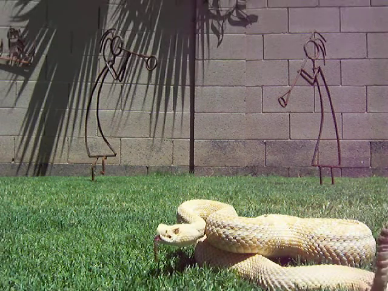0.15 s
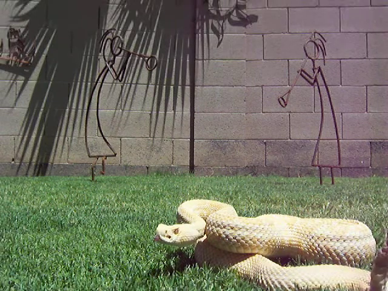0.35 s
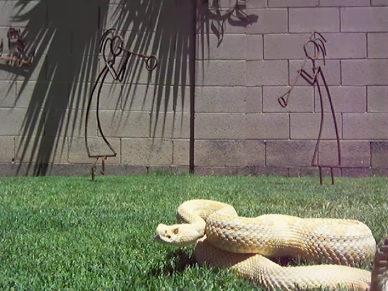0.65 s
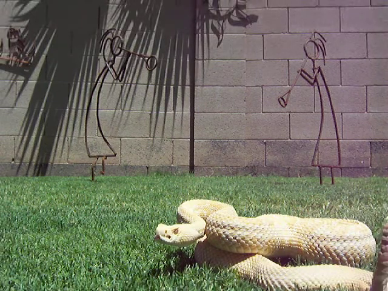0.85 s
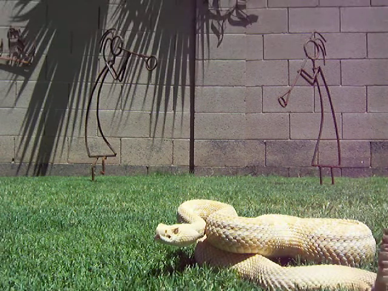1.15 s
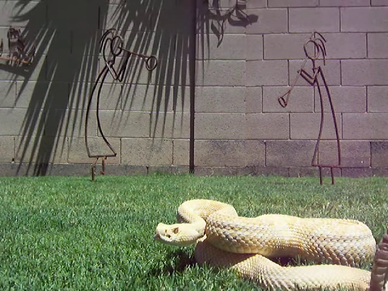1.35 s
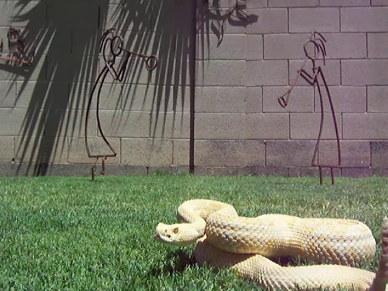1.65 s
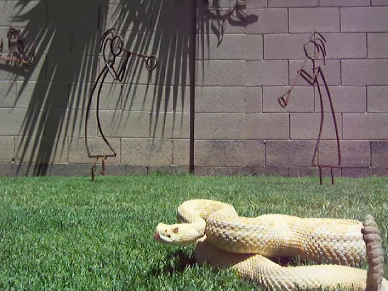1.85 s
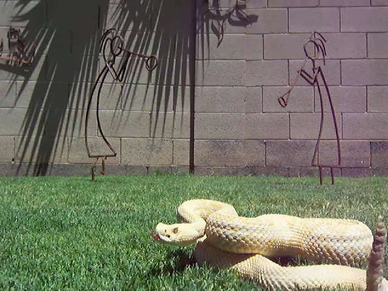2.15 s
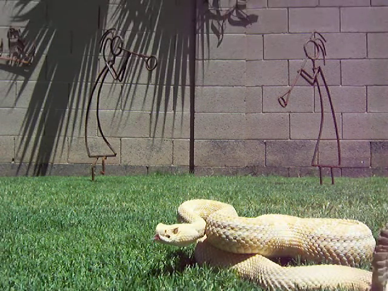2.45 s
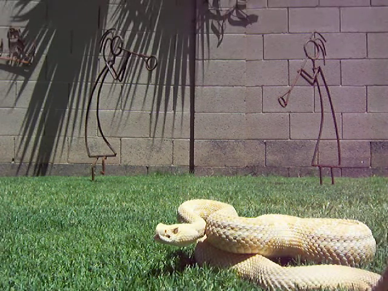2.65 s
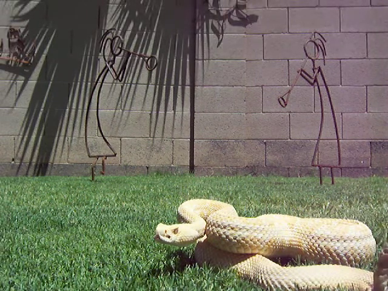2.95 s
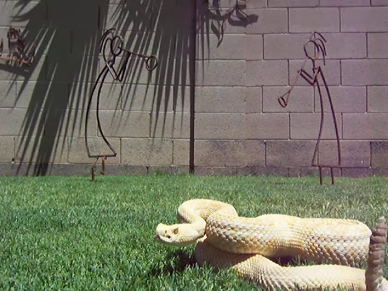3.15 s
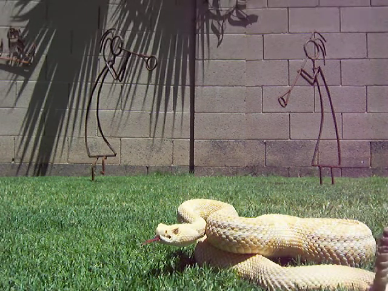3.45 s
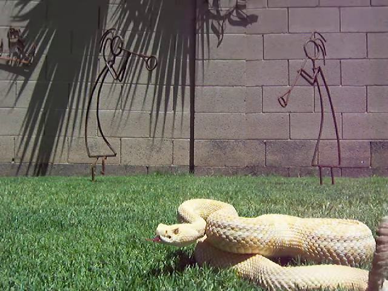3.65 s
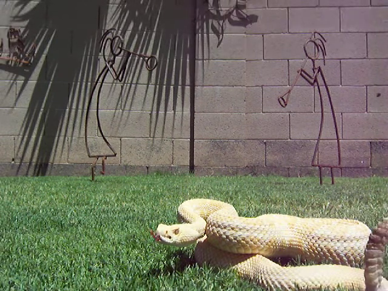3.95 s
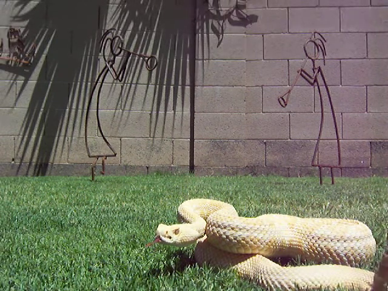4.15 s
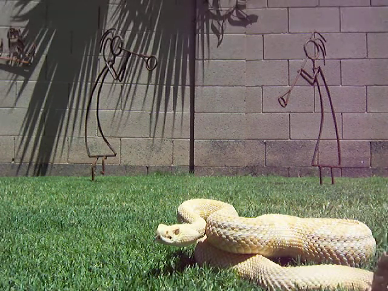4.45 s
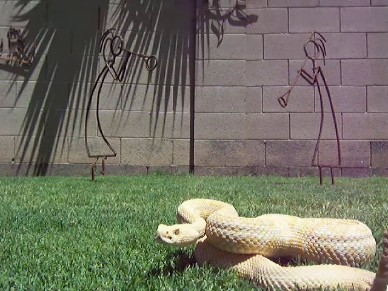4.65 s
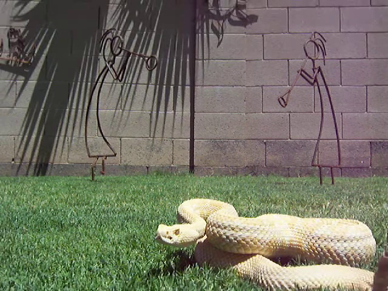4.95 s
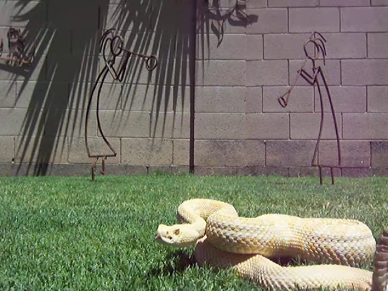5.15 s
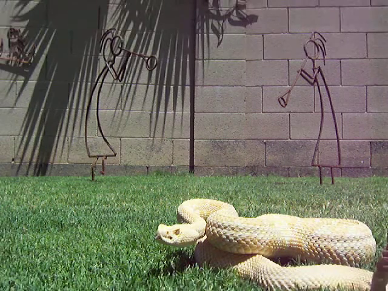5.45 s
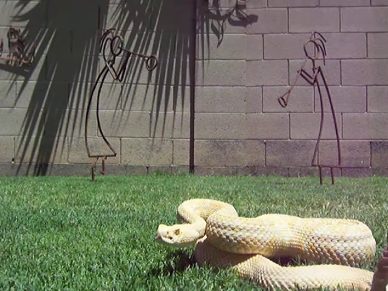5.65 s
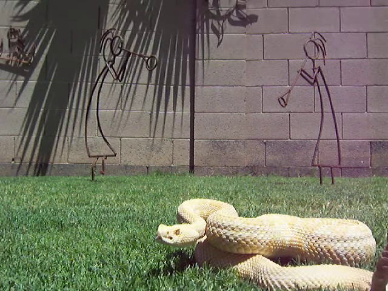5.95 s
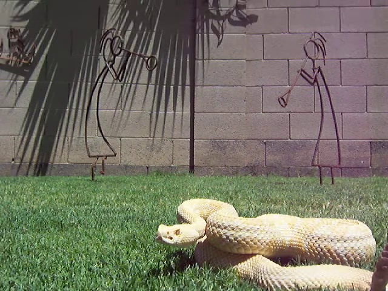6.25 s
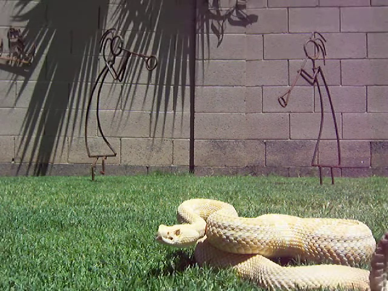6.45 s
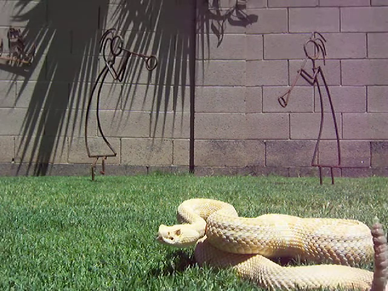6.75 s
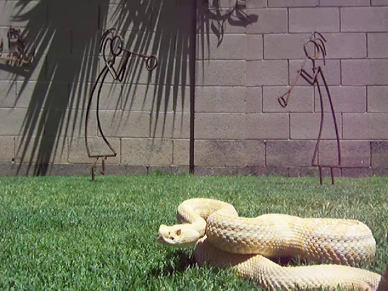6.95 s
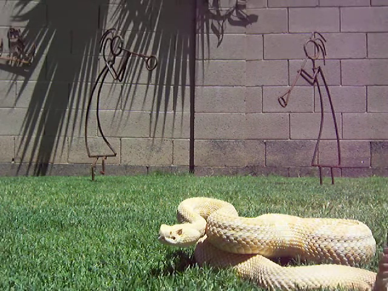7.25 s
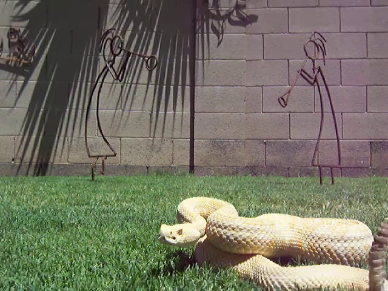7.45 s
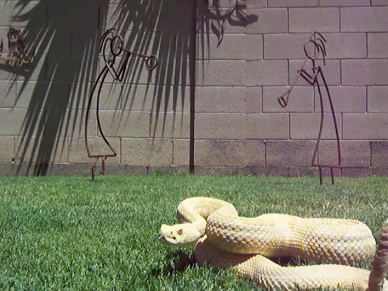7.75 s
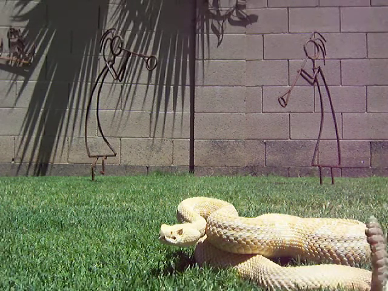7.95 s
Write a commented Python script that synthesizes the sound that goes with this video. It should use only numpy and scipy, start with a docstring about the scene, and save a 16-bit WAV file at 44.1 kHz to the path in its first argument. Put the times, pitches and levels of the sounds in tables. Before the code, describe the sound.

Dry, hollow rattlesnake buzz close up outdoors, stuttering into separate rasps, pausing briefly and resuming, with a faint low hum behind.

```python
"""Rattlesnake and distant machines

A rattlesnake shakes its tail close by: hollow horny segments click together and scrape, in runs of 10 to
20 shakes a second that merge into a buzz or break into single flicks. Noise and random clicks pass
through the shells' resonances. The tail rests for about a second, leaving a faint hiss of filtered noise.
Distant machines drone and throb as beating sines, under soft outdoor air of coloured noise."""
import sys
import numpy as np
from scipy import signal
from scipy.fft import rfft, irfft
from scipy.io import wavfile
from scipy.ndimage import uniform_filter1d

SR = 44100
rng = np.random.default_rng(int(sys.argv[2]) if len(sys.argv) > 2 else 0)


def unload_audio(sound):
    """Save the sound as a 16-bit wav file, at the path given as the first command line argument."""
    columns = np.transpose(np.atleast_2d(sound))
    # keep every value between -1 and 1, then stretch to whole-number steps
    steps = np.round(np.clip(columns, -1, 1) * 32767)
    wavfile.write(sys.argv[1], SR, steps.astype(np.int16))


N = 357651
TIME = np.arange(N) / SR


def undb(db):
    """Logarithmic level: decibels to amplitude gain."""
    return 10 ** (np.asarray(db) / 20)


def unit(x):
    """Power normalisation: scale to rms 1."""
    return x / np.sqrt(np.mean(x ** 2))


def gain_curve(rows):
    """Envelope interpolation: gain at every sample from rows of seconds and dB."""
    return undb(np.interp(TIME, *np.transpose(rows)))


def walk(rate):
    """Band-limited chance: `rate` random levels a second joined by straight lines, spread near 1."""
    step = max(int(SR / rate), 1)
    levels = np.repeat(rng.standard_normal(N // step + 1), step)
    return 1.2 * uniform_filter1d(levels, step)[:N]


def colour(x, points, size=2048):
    """Minimum-phase filtering: a causal response of unit power through points of Hz and dB."""
    hz, db = np.transpose(points)
    f = np.maximum(np.arange(size // 2 + 1) * SR / size, 1)
    log_gain = np.log(undb(np.interp(np.log(f), np.log(hz), db)))
    # folding the cepstrum onto positive time makes the response causal
    cepstrum = irfft(log_gain)
    cepstrum[1:size // 2] *= 2
    cepstrum[size // 2 + 1:] = 0
    response = irfft(np.exp(rfft(cepstrum)))
    return signal.fftconvolve(x, response / np.linalg.norm(response))[:N]


def noise(points):
    """Spectral shaping: white noise coloured to the given points, rms near 1."""
    return colour(rng.standard_normal(N), points)


def tone(hz, wander):
    """Frequency modulation: a sine of rms 1 whose pitch drifts by about the fraction `wander`."""
    phase = 2 * np.pi * np.cumsum(hz * (1 + wander * walk(6))) / SR
    return np.sqrt(2) * np.sin(phase)


# Resonant colour of the hollow shells. Each row: frequency in Hz, relative level in dB.
SHELL_COLOUR = [(600, -32), (1020, -23.5), (1300, -27), (2050, -22.5), (2500, -13), (3200, -6), (3700, 0.5),
                (4600, 2.05), (5000, -5), (6100, -5.5), (6520, -2.5), (7600, -7), (8400, -18), (8900, -36)]


def rattle(turn_hz=132, turn_jitter=.15, bunching=.25, clicks_per_s=700, scatter_db=3.5, scrape_db=-6,
           flutter_db=2.5, taper_db=3.0, whip_s=0.0021, level_db=-4, count=6):
    """Impact and friction: loose segments knock, most at each turn of the tail, and scrape in between."""
    drive = effort()
    # sustained shaking keeps all segments flying, so the clicks crowd into a smoother buzz
    agitation = np.clip(unit(uniform_filter1d(drive, size=SR // 8)), .65, 2)
    turns = np.cumsum(turn_hz * (1 + turn_jitter * walk(70))) / SR
    contact = unit(np.exp(bunching / agitation * np.cos(2 * np.pi * turns)))
    # the chain jams and frees itself, which only shifts energy about within a shake
    freedom = undb(flutter_db / agitation * np.clip(walk(190), -1.5, 1.5))
    drive = drive * freedom / np.sqrt(uniform_filter1d(freedom ** 2, size=SR // 40))
    hz, db = np.transpose(SHELL_COLOUR)
    out = np.zeros(N)
    for place in np.linspace(-1, 1, count):  # base to tip
        # clicks_per_s is the base rate of one segment, varied by contact and agitation
        hit = rng.random(N) < contact * agitation ** 2 * clicks_per_s / SR
        strength = undb(scatter_db * np.clip(rng.standard_normal(N), -2, 2)) * rng.choice([-1, 1], N)
        clicks = unit(hit * strength / agitation)
        scrape = undb(scrape_db) * contact * rng.standard_normal(N)
        # each shake whips along the chain, so the small tip segments move later
        motion = np.interp(TIME - place * whip_s, TIME, drive)
        # towards the tip the shells ring brighter (taper in dB an octave)
        shell = np.c_[hz, db + place * taper_db * np.log2(hz)]
        out += colour(motion * (clicks + scrape), shell)
    return undb(level_db) * out / np.sqrt(count)


# The buzz that carries on between shakes. Each row: time in seconds, relative level in dB.
BUZZ_LEVEL = [(0.0, -28.5), (0.47, -32), (0.8, -48), (1.25, -42.5), (1.65, -46), (2.15, -42), (2.5, -43.5),
              (2.9, -38.5), (3.35, -30), (4.03, -49), (4.45, -50.5), (5.3, -51), (5.42, -72.5),
              (6.47, -77.5), (6.7, -51.5), (7.15, -35), (7.75, -48.5), (8.11, -45)]
# every shake jerks the rattle into motion, holds, and dies away; ATTACK_S is the shortest attack
ATTACK_S, RELEASE_DB_PER_S, SHAKE_SCATTER_DB = 0.011, 619.5, 0.7
# a buzzing rattle takes up a shake more gently: the attack doubles for every SOFTEN_DB above SLACK_DB
SLACK_DB, SOFTEN_DB = -47.5, 11
# the tail swings back weakly after a shake
REBOUND_DB, REBOUND_AFTER_S, REBOUND_WIDTH_S = -18, 0.052, .012
# just before a shake the tail turns round and the segments fall quiet, deepest when the rattle is slack
HUSH_DB, HUSH_LEAD_S, HUSH_WIDTH_S = -8, .01, 0.0054


def effort(shake_db=3.5, buzz_db=3.5):
    """Power summation: hush, jerk, hold, release and rebound of every shake, on top of the lasting buzz."""
    rows = shakes()
    power = (undb(buzz_db) * gain_curve(BUZZ_LEVEL)) ** 2
    for (start, db, hold), chance in zip(rows, rng.standard_normal(len(rows))):
        near = slice(max(int(start * SR) - SR // 20, 0), int(start * SR) + SR // 5)
        age = TIME[near] - start
        buzz_now = np.interp(start, *np.transpose(BUZZ_LEVEL))
        softness = 2 ** (max(buzz_now - SLACK_DB, 0) / SOFTEN_DB)
        hush_shape = np.exp(-((age + HUSH_LEAD_S) / HUSH_WIDTH_S) ** 2)
        hush = undb(HUSH_DB / softness ** 2 * hush_shape)
        attack = np.clip(age / (ATTACK_S * softness) + .5, 0, 1)
        release = undb(-RELEASE_DB_PER_S * np.maximum(age - hold, 0))
        jerk = attack * release
        rebound_age = age - hold - REBOUND_AFTER_S
        rebound = undb(REBOUND_DB) * np.exp(-(rebound_age / REBOUND_WIDTH_S) ** 2)
        strength = undb(shake_db + db + SHAKE_SCATTER_DB * chance)
        power[near] = power[near] * hush ** 2 + strength ** 2 * (jerk ** 2 + rebound ** 2)
    return np.sqrt(power)


# Runs of fast, evenly paced shakes of the tail.
# Each row: start in seconds, number of shakes, shakes a second, relative level in dB.
SHAKE_RUNS = [(-0.0, 3, 17.4, -30), (0.193, 5, 16, -32), (0.497, 4, 17.51, -28.0), (0.747, 4, 13.21, -28.5),
              (1.036, 11, 18.74, -28.5), (1.668, 4, 17.1, -28), (1.915, 3, 16.3, -30), (2.09, 3, 19, -27.5),
              (2.246, 2, 14.1, -29), (2.382, 3, 12.4, -28), (2.611, 9, 19.1, -27.5),
              (3.086, 13, 17.62, -29), (3.823, 2, 13.89, -29.4), (3.956, 2, 10.99, -29),
              (4.121, 4, 16.9, -30.5), (6.866, 10, 19.8, -27), (7.38, 5, 18.8, -29)]
RUN_HOLD_S = 0.022
# Halting single flicks between the runs. Each row: start in seconds, relative level in dB, hold in seconds.
SINGLE_FLICKS = [(4.365, -38, 0.019), (4.42, -45.5, .015), (4.488, -28.5, .012), (4.558, -28.5, .013),
                 (4.628, -32.5, 0.017), (4.705, -26.5, .02), (4.783, -30.5, .007), (4.852, -29, .024),
                 (4.923, -30.5, .017), (4.988, -27.5, .024), (5.065, -28.5, .027), (5.167, -26, 0.017),
                 (5.268, -27.5, 0.02), (5.343, -45, .008), (6.484, -24, 0.013), (6.579, -29.5, 0.02),
                 (6.658, -30, .017), (6.733, -28.5, .023), (6.789, -26.5, .013), (7.67, -28, 0.0098),
                 (7.752, -29, .019), (7.84, -29, .02), (7.944, -26, 0.013), (8.031, -27.5, 0.013),
                 (8.096, -31, .02)]


def shakes():
    """Periodic excitation: runs unrolled and joined with flicks, as start s, relative dB and hold s."""
    rows = [tuple(row) for row in SINGLE_FLICKS]
    for start, number, rate, db in SHAKE_RUNS:
        for k in range(int(round(number))):
            rows.append((start + k / rate, db, RUN_HOLD_S))
    return sorted(rows)


# The hardest snaps of the segments. Each row: time in seconds, relative peak level in dB.
HARD_SNAPS = [(1.2063, -18), (1.671, -14.5), (2.1447, -11), (2.2518, -7.5), (2.3871, -15), (4.055, -13),
              (4.4906, -16), (4.7045, -16), (5.1768, -16), (6.4856, -15), (6.7283, -18), (6.9316, -18),
              (7.947, -21), (8.036, -13)]


def snaps(decay_s=0.0014, level_db=-9, crack_db=-15):
    """Impulse response: the whole chain whips tight in a short cluster of clicks with a dry, broad crack."""
    push = np.zeros(N)
    for s, db in HARD_SNAPS:
        push[int(s * SR)] = undb(db)
    decay = signal.lfilter([1], [1, -np.exp(-1 / (decay_s * SR))], push)
    cluster = decay * rng.choice([-1, 1], N)
    return undb(level_db) * (colour(cluster, SHELL_COLOUR) + undb(crack_db) * cluster)


# Faint hiss while the tail rests. Each row: time in seconds, level in dB.
HISS_LEVEL = [(5.4, -70), (5.69, -59.5), (5.88, -59), (6.03, -58), (6.28, -61.5), (6.4, -56.5), (6.48, -57),
              (6.6, -80)]
# Colour of the hiss. Each row: frequency in Hz, relative level in dB.
HISS_SPECTRUM = [(500, -20), (1300, 3), (2700, 3), (4200, 3.5), (5200, 2), (7200, 0), (8500, -24)]
# A thin whistle in the hiss. Its one row: centre in seconds, half length in seconds, pitch in Hz, level in dB.
THIN_WHISTLE = (6.105, .08, 3290, -62.5)


def hiss():
    """Broadband and narrowband noise: a faint hiss, joined for a moment by a thin, unsteady whistle."""
    s, half_length, hz, db = THIN_WHISTLE
    swell = np.exp(-((TIME - s) / half_length) ** 2)
    whistle = undb(db) * swell * tone(hz, wander=0.0034) * unit(walk(300))
    return gain_curve(HISS_LEVEL) * noise(HISS_SPECTRUM) + whistle


def bump(s=1.360, hz=403, rise_s=0.022, db=-49.5):
    """Damped resonance: one soft, hollow knock that swells and dies away."""
    age = np.maximum(TIME - s, 0) / rise_s
    swell = (age * np.exp(1 - age)) ** 2
    return undb(db) * swell * tone(hz, wander=0.0046)


# A lower, beating hum. Each row: time in seconds, relative level in dB.
HUM_LEVEL = [(0, -51), (2.2, -44.5), (4.5, -46.5), (6.3, -40.5), (7.5, -48.5), (8.11, -41)]
# The mean pitches of its pair of tones, in Hz.
HUM_PITCHES = (54, 59.2)
# Weak machine tones. Each row: mean frequency in Hz, mean level in dB.
MACHINE_TONES = [(120, -63), (158.6, -61.5), (178, -68), (237, -70), (293, -69), (742, -76.5)]


def machines(drone_db=0, hum_db=-2.5, beat_db=-3, waver_db=2):
    """Superposition: a deep drone throbs over a beating pair of hums and a few weak, wavering tones."""
    drone = undb(drone_db) * throbbing()
    low, high = HUM_PITCHES
    pair = tone(low, wander=0.0039) + undb(beat_db) * tone(high, wander=0.0028)
    hum = undb(hum_db) * gain_curve(HUM_LEVEL) * pair
    weak = sum(undb(db + waver_db * walk(2.4)) * tone(hz, wander=.003) for hz, db in MACHINE_TONES)
    return drone + hum + weak


# Throbs of the drone, each swelling and fading until the next begins.
# Each row: start in seconds, level in dB at the middle of the throb.
DRONE_THROBS = [(-.15, -43), (.57, -37.5), (1.32, -41.5), (2.1, -42), (2.76, -41.5), (3.35, -42.5),
                (4.06, -38), (4.77, -36.5), (5.53, -37), (6.36, -38.5), (7.0, -40), (7.68, -41)]
DRONE_HZ, LAST_THROB_S = 79, .7  # pitch; length of the final throb


def throbbing(trough_db=-18):
    """Beats: two machines slightly out of step; their common tone swells, all but cancels, and swells again."""
    starts, db = np.transpose(DRONE_THROBS)
    edges = np.r_[starts, starts[-1] + LAST_THROB_S]
    beat = np.interp(TIME, edges, np.arange(len(edges)))  # counts throbs
    strength = undb(np.interp(beat, np.arange(len(db)) + .5, db))
    angle = 2 * np.pi * DRONE_HZ * TIME
    swelling = np.sin(np.pi * beat) * np.sin(angle)
    # a weak quadrature part keeps the troughs from falling silent
    remainder = undb(trough_db) * np.cos(np.pi * beat) * np.cos(angle)
    return np.sqrt(2) * strength * (swelling + remainder)


# Colour of the outdoor air. Each row: frequency in Hz, relative level in dB.
AIR_SPECTRUM = [(20, 7), (32, 9), (60, 2.5), (100, -4.5), (180, -13.5), (300, -19.5), (500, -21),
                (820, -26), (1100, -32), (1700, -30), (3000, -29.5), (7200, -32), (8500, -52.5)]
# A soft rush that comes and goes. Each row: time in seconds, relative level in dB.
RUSH_LEVEL = [(0, -63), (1.2, -56), (2.7, -54.5), (3.1, -68), (3.7, -57), (4.45, -50), (4.75, -55),
              (5.0, -51), (5.5, -51), (6.05, -48.5), (6.4, -50), (6.7, -56), (7.5, -62.5), (7.95, -52.5)]
# Colour of the rush. Each row: frequency in Hz, relative level in dB.
RUSH_SPECTRUM = [(30, 6), (110, 4), (220, 0.5), (400, -6.5), (800, -12.5), (1500, -19), (4000, -47)]


def outdoors(air_db=-45, rush_db=2, flutter_db=1):
    """Amplitude-modulated noise: steady air with a low, fluttering rush swelling over it."""
    air = undb(air_db) * noise(AIR_SPECTRUM)
    flutter = undb(rush_db + flutter_db * walk(9))
    rush = gain_curve(RUSH_LEVEL) * flutter * noise(RUSH_SPECTRUM)
    return air + rush


def scene():
    """Linear mixing: the rattle in front, the machines and the air behind it, in one channel."""
    return (rattle() + snaps() + hiss() + bump() + machines() + outdoors())[None]


# The centres of the two narrow treble notches, in Hz.
NOTCHES = (7500, 8500)
TOP_HZ = 8850  # upper edge of the passband


def record(dry):
    """Band limitation: a small camera has two narrow notches in the treble and cuts the top steeply."""
    for hz in NOTCHES:
        dry = signal.lfilter(*signal.iirnotch(hz, 80, fs=SR), dry)
    # order 10, 0.2 dB ripple below the edge, 80 dB rejection above
    return signal.sosfilt(signal.ellip(10, .2, 80, TOP_HZ, fs=SR, output="sos"), dry)


dry = scene()
out = record(dry)
unload_audio(out)
```